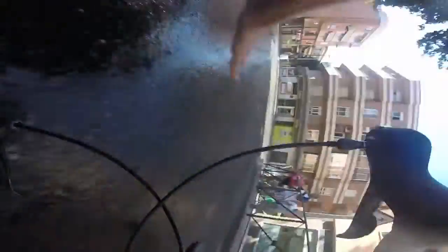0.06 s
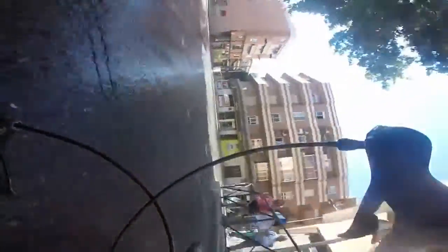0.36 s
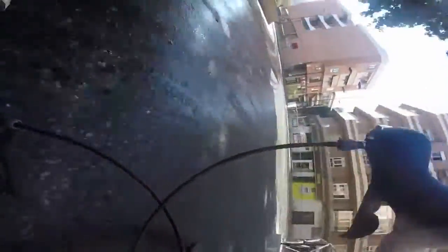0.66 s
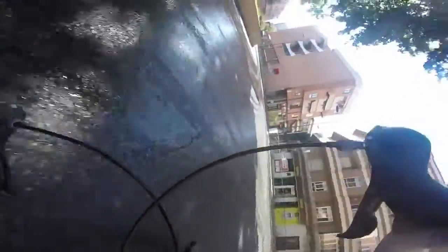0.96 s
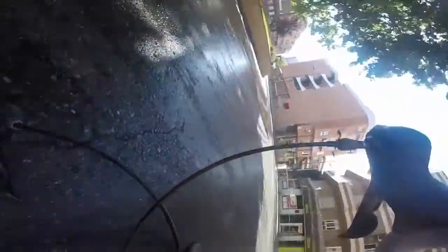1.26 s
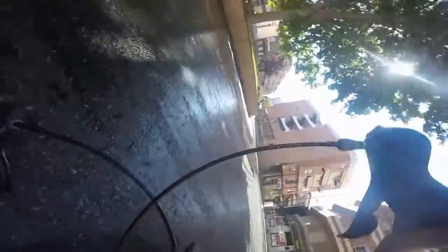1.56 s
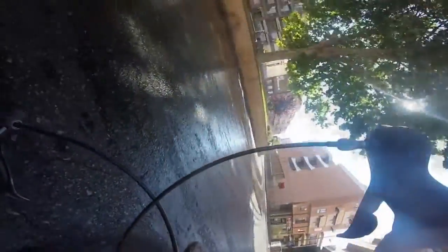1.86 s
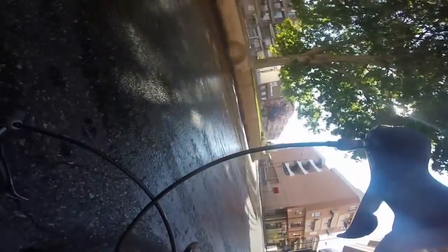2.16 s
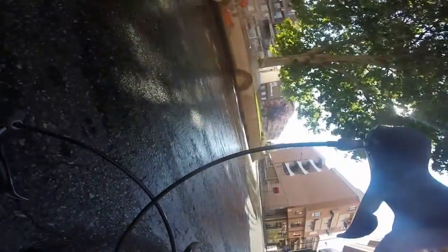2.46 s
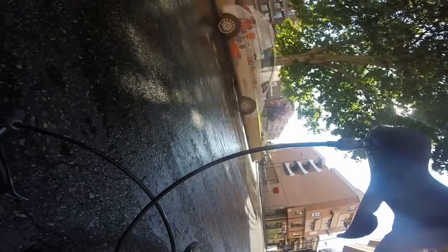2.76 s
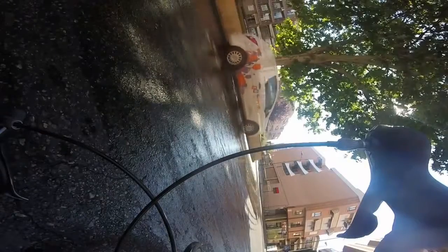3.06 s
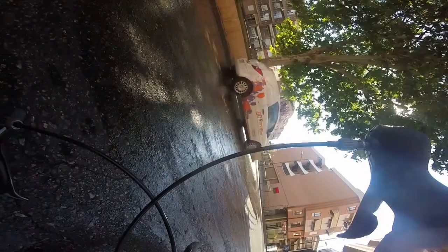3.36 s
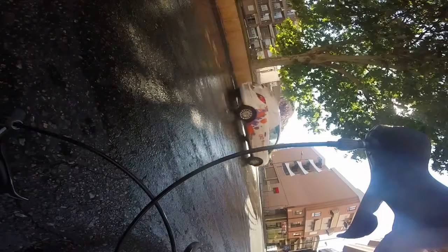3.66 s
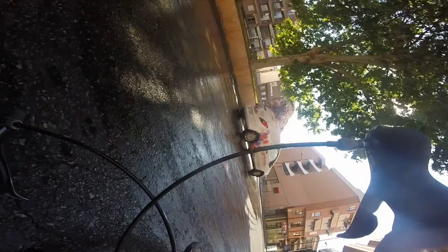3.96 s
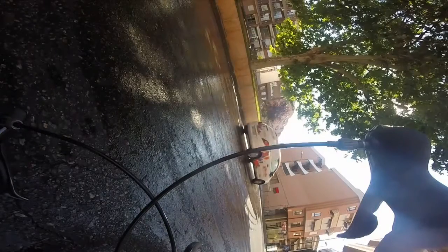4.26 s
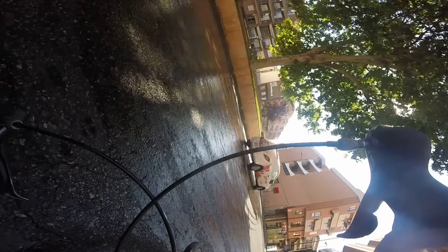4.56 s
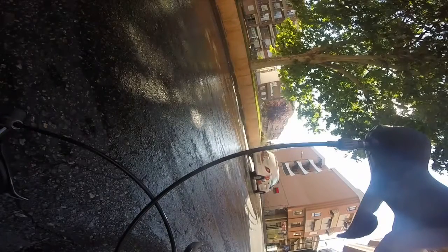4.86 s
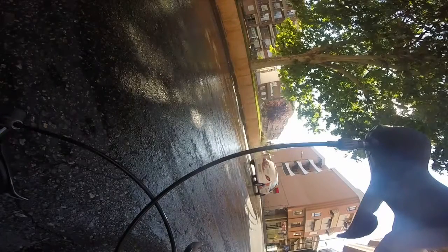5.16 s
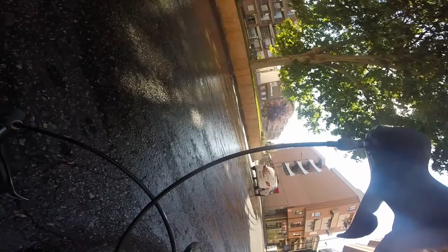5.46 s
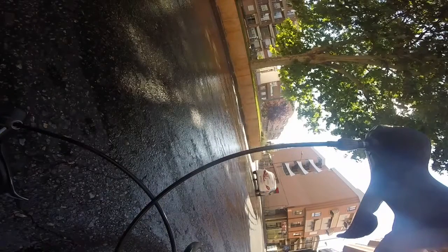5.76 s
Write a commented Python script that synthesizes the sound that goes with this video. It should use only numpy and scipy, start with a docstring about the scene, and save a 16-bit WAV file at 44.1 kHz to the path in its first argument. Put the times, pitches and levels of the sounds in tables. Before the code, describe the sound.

A fallen bicycle skips and slides over asphalt, heard very close from a microphone fixed to its handlebar. Gritty, juddering scrapes and heavy thumps come thicker and faster for about two seconds, then stop. The metal rings on in a low, fading hum. A quiet street remains, with a soft traffic hiss, a far engine, a few tiny ticks and a faint rapid chirring near the end.

```python
"""On an asphalt street a fallen bicycle skips and slides, heard from a camera bolted to its handlebar.
At each touch, friction drives grit noise and a stick-slip judder into the bar, and the impact thumps
the frame. The touches merge and stop, and the frame rings out in damped free vibration. A quiet street
remains: hiss, a far engine and a faint chirring, perhaps a freewheel or an insect."""
import sys
import numpy as np
from scipy import signal
from scipy.fft import rfft, irfft, next_fast_len
from scipy.io import wavfile
from scipy.ndimage import uniform_filter1d

SR = 44100
rng = np.random.default_rng(int(sys.argv[2]) if len(sys.argv) > 2 else 0)


def transcribe(u):
    """Save the signal u as a 16-bit wav file named by the first command-line argument.

    u: samples, shape (n,) or (channels, n), limited to [-1, 1]; the rate is SR.
    q: integer samples, one column per channel.
    """
    v = np.clip(np.atleast_2d(u).T, -1, 1)
    q = np.round(v * 32767).astype(np.int16)
    wavfile.write(sys.argv[1], SR, q)


N = 256220
T = np.arange(N) / SR

# Metal on the road. Each row: start in seconds, length in seconds, level in dB, relative judder in dB.
SCRAPES = [(0, 0.057, -28, -33), (.075, 0.0054, -29.5, -4), (.156, 0.0046, -9, 0),
           (0.163, 0.023, -16.5, -10.5), (0.205, .016, -27, -16), (.291, 0.028, -15, 1),
           (.401, 0.029, -24, -24), (0.488, 0.0066, -14, -21.5), (0.505, 0.0016, -12, -15),
           (0.517, 0.0018, -20, -9), (.54, 0.0085, -15.5, 1), (0.555, .007, -9, -8),
           (.631, 0.0079, -23.5, -7), (0.741, 0.0364, -29, 3.5), (.779, 0.011, -14.5, -7),
           (0.921, 0.018, -14.5, -3), (.95, 0.0097, -12.5, -10), (1.048, 0.049, -18.5, -3.5),
           (1.145, 0.034, -19, -10), (1.222, 0.017, -15.5, -5), (1.33, 0.02, -19, -6.5),
           (1.41, 0.065, -15, -6), (1.511, 0.0285, -17, -1.5), (1.589, 0.063, -19.5, -2),
           (1.665, 0.0061, -16, 0.5), (1.711, 0.059, -22, -4.5), (1.813, 0.034, -23.5, -1.5),
           (1.855, 0.0074, -16.5, -11.5), (1.883, 0.022, -24.5, -9), (1.936, 0.0073, -17, -7),
           (1.978, .005, -27.5, -20), (1.995, 0.0052, -23, 2), (2.066, 0.0094, -46, -4),
           (2.127, 0.0048, -30.5, -21)]
# Heavy impacts. Each row: start in seconds, envelope peak in dB, pitch in Hz.
KNOCKS = [(.006, -5, 120.6), (.057, -4.5, 121), (.421, -7, 111), (.634, -11.5, 78), (.733, -21, 65),
          (1.233, -6, 118.3), (1.3, -10, 132), (1.998, -4.5, 128), (2.071, -10, 106), (2.18, -11, 100.4),
          (2.216, -12, 107.7), (2.275, -12.5, 103)]
# Settling parts. Each row: start in seconds, length in seconds, level in dB.
TICKS = [(2.248, 0.0049, -59), (2.777, .0017, -47.5), (2.821, 0.056, -57.5), (4.226, 0.0015, -50),
         (4.832, 0.0032, -40), (5.435, .002, -43.5)]
# Envelopes of the slide. Each row: time in seconds, relative level in dB.
SHAKE_LEVELS = [(0, -15), (.35, -23), (.68, -16), (1.0, -19), (2.26, -21), (2.36, -32)]
DRAG_LEVELS = [(0, -38), (.3, -32), (.42, -42.5), (.62, -30), (.77, -28.5), (.86, -33), (1.05, -23.5),
               (1.33, -34.5), (1.48, -21.5), (1.72, -19.5), (1.8, -28.5), (1.96, -25.5), (2.04, -42),
               (2.3, -53), (2.6, -75)]
RATTLE_LEVELS = [(0, -48.5), (1.4, -35.5), (1.95, -28), (2.03, -41), (2.3, -54), (2.6, -83)]
# Normal modes. Each row: frequency in Hz, level in dB, time to decay by 60 dB in seconds.
FRAME_MODES = [(60.6, -35, 1.8), (83.7, -25.5, 1.58), (112.5, -26.5, 1.05), (124, -33, 2.42),
               (158, -37.5, 1.45), (285, -47, 2), (308, -46, 3.2), (344, -42.5, 2.6), (368, -53, 4.7),
               (384, -45.5, 2), (393, -46, 3.5), (434, -49.5, 2), (440, -50.5, 1.9), (560, -60, 3.0),
               (590, -50, 1.7), (860, -57.5, 1.4)]
RATTLE_MODES = [(1090, -5, 0.024), (1580, 0, 0.036), (2090, -6, .033), (2520, -16, 0.025),
                (4310, -28, .025)]
# Spectra of the noise sources. Each row: frequency in Hz, relative level in dB.
GRIND_SPECTRUM = [(150, 10), (260, 0), (400, 2.5), (570, 0), (720, -2), (920, 2), (1140, -3), (1300, -9),
                  (1540, -4.5), (1760, -11), (2030, -12), (2400, -34.5)]
GRIT_SPECTRUM = [(900, -21), (2000, -4), (2600, -3.5), (3100, -3.5), (3700, -12.5), (4400, -13.5),
                 (5200, -22.5), (6500, -24), (8500, -30), (10000, -38), (12500, -46), (14500, -59)]
THUD_SPECTRUM = [(170, -2), (240, 1.5), (320, -1), (430, 3.5), (560, -21), (800, -15.5)]
SHAKE_SPECTRUM = [(15, -16.5), (27, -0.5), (38, -11.5), (46, 0), (58, -1), (72, -2.5), (90, -11.5),
                  (120, -7), (160, -8), (220, -16.5), (350, -33.5), (700, -33)]
DRAG_SPECTRUM = [(180, 5), (280, -4), (420, 0), (700, -7), (1000, -3.5), (1450, -1.5), (1850, -15.5),
                 (2600, -19), (3300, -22.5), (4300, -30.5), (6700, -43), (9000, -52.5), (11000, -73),
                 (14500, -76.5)]
CRUMB_SPECTRUM = [(2200, 6.5), (4400, -2), (7000, -3.5), (9200, -4), (11000, -27), (14500, -18.5)]
TICK_SPECTRUM = [(1400, -20), (1950, -0.5), (2600, 4), (3200, -3), (4500, -16), (6200, -7), (9000, -40),
                 (13000, -46)]
CHIRR_SPECTRUM = [(1200, -1), (1800, -3), (2600, 0.5), (3500, 6.5), (4900, -20), (6200, -1.5), (7500, -14),
                  (9300, -24), (13000, -29)]
TRAFFIC_SPECTRUM = [(13, -48), (22, -5), (134, -4), (157, -6), (200, -9.5), (361, -14), (477, -13.5),
                    (567, -13.5), (608, -15), (1310, -21), (1400, -14), (1820, -26), (3080, -120)]
HISS_SPECTRUM = [(1100, -8), (1500, -4.5), (1850, -5.5), (2600, -3), (3300, -4.5), (3900, -11.5),
                 (4900, -15), (5900, -15.5), (7500, -18.5), (9300, -21), (11000, -28), (14500, -40)]
# Narrow bands of the handlebar, chirring and hiss. Each row: centre in Hz, width in Hz, gain in dB.
BAR_RESONANCES = [(427.6, 11, 7), (567, 31, 5), (993, 72, 2.5), (1127, 62, 5.5), (1450, 330, 6.5),
                  (1580, 78, -5.5), (1990, 76, 6), (2500, 160, 9.5), (2843, 190, 6), (4390, 250, 2),
                  (6300, 200, 4), (8400, 250, 2)]
CHIRR_RESONANCES = [(1390, 70, 16), (2530, 140, 17.6), (4180, 150, 16.6), (6500, 315, 3.04)]
HISS_BANDS = [(1427, 52, 13), (2080, 130, 8.5), (2600, 260, 9), (3260, 280, 3), (4280, 140, 5.5),
              (5750, 280, 6)]
# Street noise. Each row: time in seconds, level of the low wash in dB, level of the hiss in dB.
STREET_LEVELS = [(2.35, -61.5, -65), (2.85, -55, -57), (4.0, -54.5, -55.5), (5.81, -52.5, -52.5)]
# The far engine. Each row: time in seconds, pitch in Hz, relative level in dB.
ENGINE_COURSE = [(2.4, 134, -79.5), (3.0, 132, -51.5), (3.4, 115, -64.5), (4.0, 131, -56.5),
                 (4.4, 132, -62), (5.2, 127, -57.5), (5.81, 121.2, -47.5)]
# Its partials. Each row: multiple of the pitch, relative level in dB.
ENGINE_ORDERS = [(1, -1), (1.6, -16), (2.13, -9)]

REST_S = 2.28  # the bicycle stops
GRIT_DB, GRIT_FADE_DB_PER_S, GRIT_LOSS_PER_JUDDER_DB = -9, 2, 0.17
JUDDER_FLOOR_HZ, JUDDER_EXTRA_HZ, JUDDER_SAG_S = 1029, 420, .17
SQUEAL_HZ, SQUEAL_DB, SQUEAL_RISE_DB_PER_S = 1560, -21, 8  # a higher judder grows at low speed
JOLT_DB, JOLT_DB_PER_SCRAPE_DB, JOLT_HZ, JOLT_LAG_S = -9, 0.31, 118.2, 0.0072
BUMP_SPAN_S, BUMP_GAP_S, BUMP_DB = (0.99, 1.96), .055, -12.5
CRUMBS_DB, CRUMBS_PER_S = -63.5, 140
CHIRR_START_S, CHIRR_GAP_S = 4.3538, .0733
CHIRR_PEAK_S, CHIRR_DB, CHIRR_FADE_DB_PER_S = 5.37, -45, 10
CUTOFF_HZ = 15600


def scrapes():
    """Friction: stones excite the bar, and stick-slip adds a judder that falls as the bicycle slows."""
    grind, grit, judder = np.zeros((3, N))
    for s, length, db, judder_db in SCRAPES:
        grit_db = db - GRIT_LOSS_PER_JUDDER_DB * judder_db
        add(grind, s, undb(db) * touch(length, attack=0.00053, release=0.0061))
        add(grit, s, undb(grit_db) * touch(length, attack=0.0013, release=0.0067))
        add(judder, s, undb(db + judder_db) * touch(length, attack=0.001, release=0.0034))
    wobble = 1 + 0.0369 * walk(350) + 0.0298 * walk(45)
    tone = lambda hz: np.sqrt(2) * np.sin(2 * np.pi * np.cumsum(hz * wobble) / SR)
    catching = unit(undb(1.3 * walk(380)))  # the metal catches on the larger stones
    stones = grains(rate=1500) * catching
    body = grind * colour(stones, GRIND_SPECTRUM, BAR_RESONANCES)
    edge = undb(GRIT_DB - GRIT_FADE_DB_PER_S * T) * grit * colour(stones, GRIT_SPECTRUM, BAR_RESONANCES)
    chatter = judder * tone(JUDDER_FLOOR_HZ + JUDDER_EXTRA_HZ * np.exp(-T / JUDDER_SAG_S))
    squeal = undb(SQUEAL_DB + SQUEAL_RISE_DB_PER_S * T + 3.4 * walk(30)) * grind * tone(SQUEAL_HZ)
    return body + edge + (chatter + squeal) * catching


def blows():
    """Impact excitation: knocks, a jolt per scrape and small road bumps, in rows like those of KNOCKS."""
    jolts = [(s + JOLT_LAG_S, JOLT_DB + JOLT_DB_PER_SCRAPE_DB * db,
              JOLT_HZ * (1 + 0.12 * rng.standard_normal())) for s, _, db, _ in SCRAPES]
    scatter = rng.standard_normal((64, 3))
    bumps = [(s + .008 * late, BUMP_DB + 1.2 * hard, JOLT_HZ * (1 + 0.097 * high))
             for s, (late, hard, high) in zip(np.arange(*BUMP_SPAN_S, BUMP_GAP_S), scatter)]
    return KNOCKS + jolts + bumps


def frame():
    """Forced vibration: blows swing the frame and thud in its tubes; it shudders until it stops."""
    swings, force = np.zeros((2, N))
    t = T[:SR // 5]
    pulse = (1 - np.exp(-t / 0.0022)) ** 2 * np.exp(-t / 0.014)
    pulse /= pulse.max()
    for s, db, hz in blows():
        add(swings, s, undb(db) * pulse * np.sin(2 * np.pi * hz * t))
        add(force, s, undb(db) * pulse)
    softening = undb(-11.5 - 9.3 * T)  # the thuds weaken as speed is lost
    thud = softening * force * colour(noise(), THUD_SPECTRUM, BAR_RESONANCES)
    shake_db, = curves(SHAKE_LEVELS)
    settling = np.exp(-np.maximum(T - REST_S, 0) / 0.12)
    shudder = undb(shake_db - 2 + walk(11)) * settling * colour(noise(), SHAKE_SPECTRUM)
    return swings + thud + shudder


def drag():
    """Sliding friction: softer parts rub unevenly on the road between the scrapes."""
    db, = curves(DRAG_LEVELS)
    pressure = undb(db) * unit(undb(2.0 * walk(70)))
    return pressure * colour(grains(rate=1200), DRAG_SPECTRUM, BAR_RESONANCES)


def ring_out():
    """Damped free vibration: at rest the frame and wheels ring on, wavering as they rock."""
    out, t = np.zeros(N), T[:2 * SR]
    for hz, db, t60 in FRAME_MODES:
        waver = undb(2.0 * walk(16.3)[:len(t)])
        pitch = hz * (1 + 0.0123 * walk(28.8)[:len(t)])
        cycles = np.cumsum(pitch) / SR + rng.random()
        envelope = (1 - np.exp(-t / 0.0186)) * decay(t, t60)
        add(out, REST_S, undb(db) * envelope * waver * np.sin(2 * np.pi * cycles))
    return out


def rattle():
    """Impulse response: random soft taps ring the short-lived modes of loose metal parts."""
    taps, t = impulses(rate=70), T[:SR // 8]
    ring = sum(undb(db) * decay(t, t60) * np.sin(2 * np.pi * hz * t) for hz, db, t60 in RATTLE_MODES)
    ring *= 1 - np.exp(-t / .0006)
    db, = curves(RATTLE_LEVELS)
    return undb(db) * unit(signal.fftconvolve(taps, ring)[:N])


def crumbs():
    """Shot noise: loose grit cracks brightly under the bicycle until it stops."""
    crack = touch(0.00054, attack=.0002, release=0.0045)
    cracks = unit(signal.fftconvolve(impulses(CRUMBS_PER_S), crack)[:N])
    sliding = T < REST_S + .02
    return undb(CRUMBS_DB) * sliding * colour(cracks * noise(), CRUMB_SPECTRUM, BAR_RESONANCES)


def ticks():
    """Contact transients: parts of the bicycle shift a little as it lies."""
    contact = np.zeros(N)
    for s, length, db in TICKS:
        add(contact, s, undb(db) * touch(length, attack=0.00031, release=0.0023))
    return contact * colour(noise(), TICK_SPECTRUM, HISS_BANDS)


def chirring():
    """Resonance under periodic pulses: bursts of two dry clicks and a weak third swell, then fade."""
    bursts = np.zeros(N)
    click = touch(.006, attack=.001, release=.003)
    for s in np.arange(CHIRR_START_S, T[-1], CHIRR_GAP_S):
        db = CHIRR_DB - CHIRR_FADE_DB_PER_S * abs(s - CHIRR_PEAK_S)
        for k, click_db in enumerate([-3.5, -4.5, -12]):
            add(bursts, s + k * .017, undb(db + click_db) * click)
    clicks = bursts * noise()
    return np.std(clicks) * colour(clicks, CHIRR_SPECTRUM, CHIRR_RESONANCES)  # energy is conserved


def traffic():
    """Broadband noise: distant traffic merges into a low wash and a hiss."""
    wash_db, hiss_db = curves(STREET_LEVELS)
    wash = undb(wash_db + 0.27 * walk(2.2)) * colour(noise(), TRAFFIC_SPECTRUM)
    hiss = undb(hiss_db + 0.7 * walk(25)) * colour(noise(), HISS_SPECTRUM, HISS_BANDS)
    return wash + hiss


def engine():
    """Engine orders: three partials follow one pitch, swelling unevenly as a far engine draws nearer."""
    hz, db = curves(ENGINE_COURSE)
    phase = 2 * np.pi * np.cumsum(hz * (1 + 0.0027 * walk(6.5))) / SR
    hum = sum(undb(order_db) * np.sin(k * phase) for k, order_db in ENGINE_ORDERS)
    return undb(db + 2.0 * walk(3.5)) * hum


def touch(length, attack, release):
    """Contact pressure: an exponential rise, a hold and a fall, all in seconds."""
    t = T[:int((length + 8 * release) * SR)]
    return (1 - np.exp(-t / attack)) * np.exp(-np.maximum(t - length, 0) / release)


def grains(rate):
    """Roughness noise: tiny collisions with stones over a fine abrasive hiss."""
    return unit(impulses(rate)) + .45 * noise()


def impulses(rate):
    """Poisson process: impulses of random size, on average `rate` a second."""
    return (rng.random(N) < rate / SR) * noise()


def colour(x, spectrum, resonances=()):
    """Linear filtering by a broad spectrum with narrow resonances on top; rms 1."""
    size = next_fast_len(N)
    f = np.maximum(np.arange(size // 2 + 1) * SR / size, 1)
    hz, db = np.transpose(spectrum)
    octaves_outside = np.maximum(np.log2(f / hz[-1]), 0) + np.maximum(np.log2(hz[0] / f), 0)
    gain_db = np.interp(np.log(f), np.log(hz), db) - 30 * octaves_outside
    for centre, width, lift in resonances:
        gain_db += lift / (1 + (2 * (f - centre) / width) ** 2)
    return unit(irfft(rfft(x, size) * undb(gain_db), size)[:N])


def decay(t, t60):
    """Exponential damping by 60 dB in t60 seconds."""
    return np.exp(-np.log(1000) * t / t60)


def noise():
    """White noise."""
    return rng.standard_normal(N)


def walk(rate):
    """Smooth random modulation through `rate` values a second; rms 1."""
    hold = max(int(SR / rate), 1)
    steps = np.repeat(rng.standard_normal(N // hold + 1), hold)
    return unit(uniform_filter1d(steps, hold)[:N])


def curves(table):
    """Linear interpolation of a table's columns in time."""
    s, *columns = np.transpose(table)
    return [np.interp(T, s, c) for c in columns]


def undb(db):
    """Decibels to amplitude ratio."""
    return 10 ** (np.asarray(db) / 20)


def unit(x):
    """Scale to rms 1."""
    return x / np.sqrt(np.mean(x ** 2))


def add(track, s, sound):
    """Superpose a sound at s seconds."""
    i = min(max(int(s * SR), 0), N)
    track[i:i + len(sound)] += sound[:N - i]


def scene():
    """Superposition: the slide, the ring-out and the street sum in one channel."""
    slide = scrapes() + drag() + crumbs() + rattle() + frame()
    return (slide + ring_out() + traffic() + engine() + chirring() + ticks())[None]


def record(dry):
    """Saturation and band limiting: the camera rounds the largest peaks and cuts the highest treble."""
    rounded = dry / (1 + dry ** 8) ** (1 / 8)
    lowpass = signal.ellip(8, .2, 70, CUTOFF_HZ, fs=SR, output="sos")
    return signal.sosfilt(lowpass, rounded)


dry = scene()
out = record(dry)
transcribe(out)
```